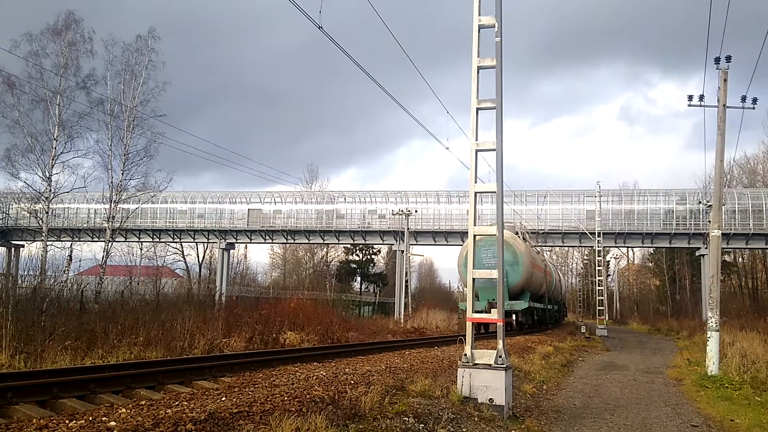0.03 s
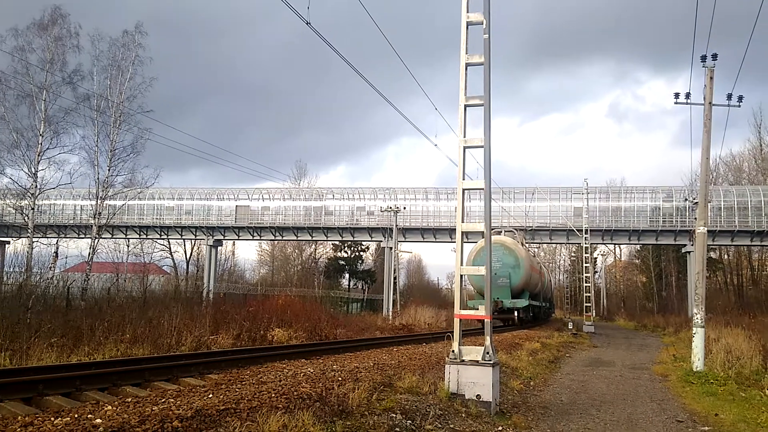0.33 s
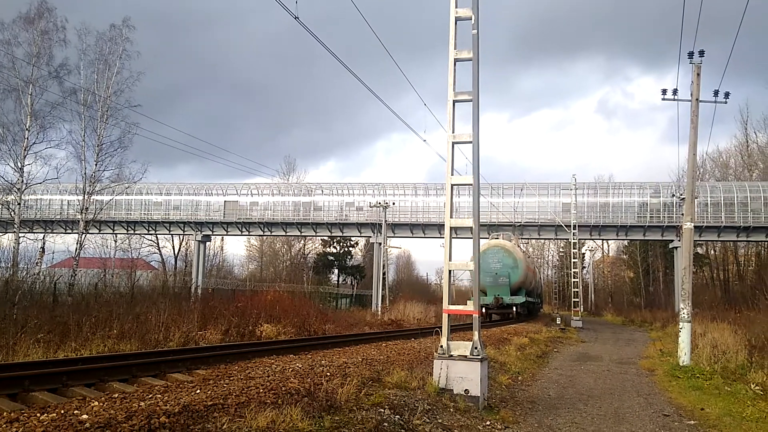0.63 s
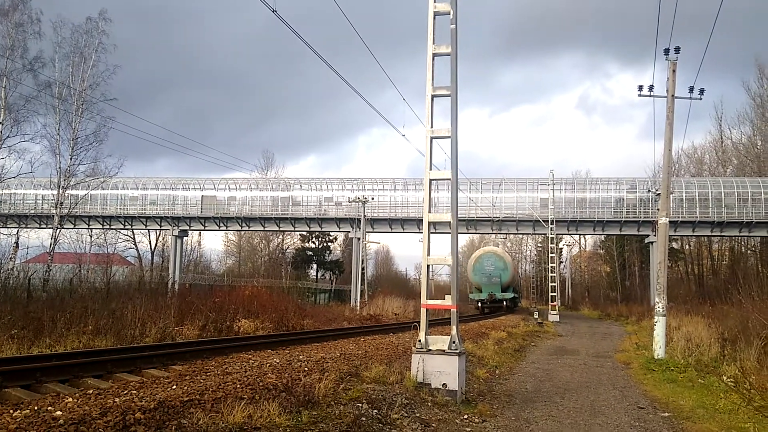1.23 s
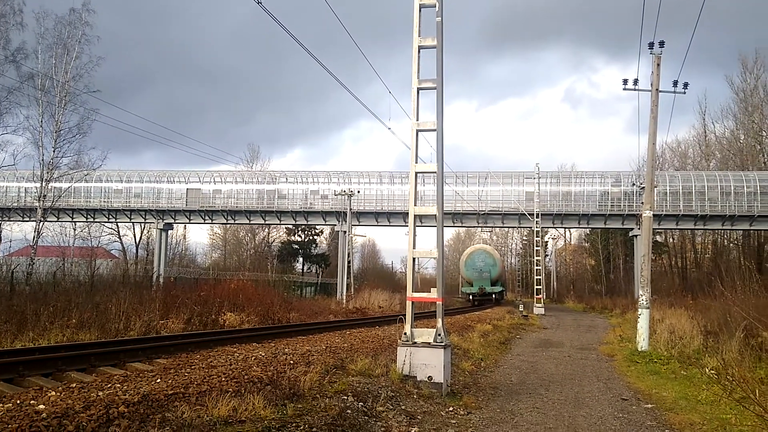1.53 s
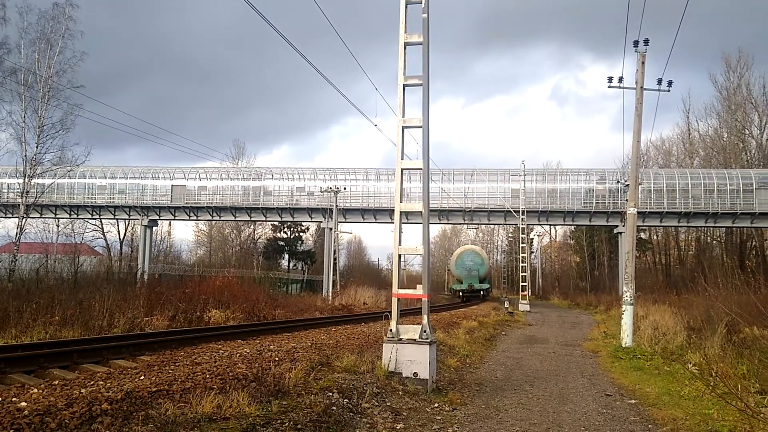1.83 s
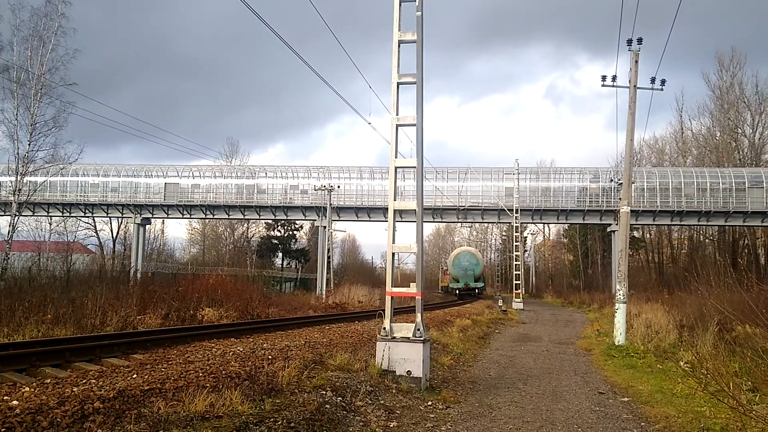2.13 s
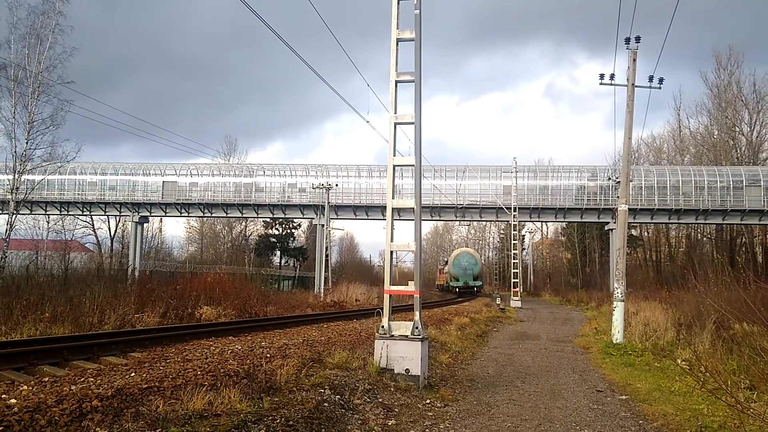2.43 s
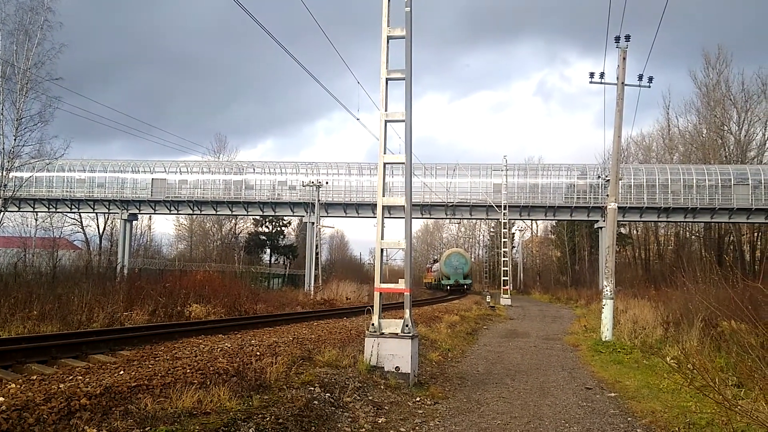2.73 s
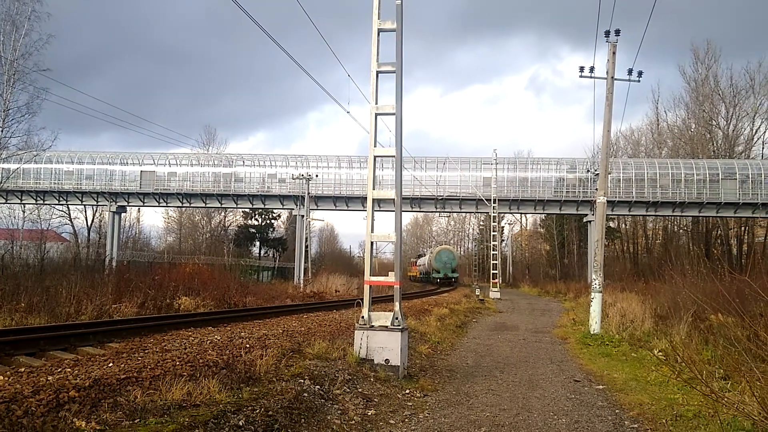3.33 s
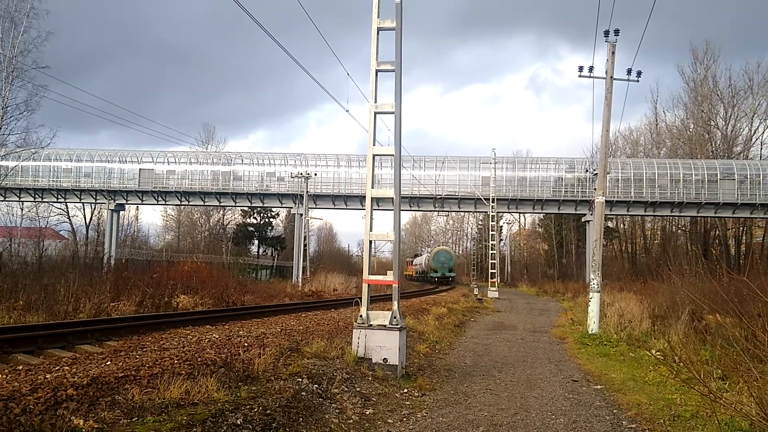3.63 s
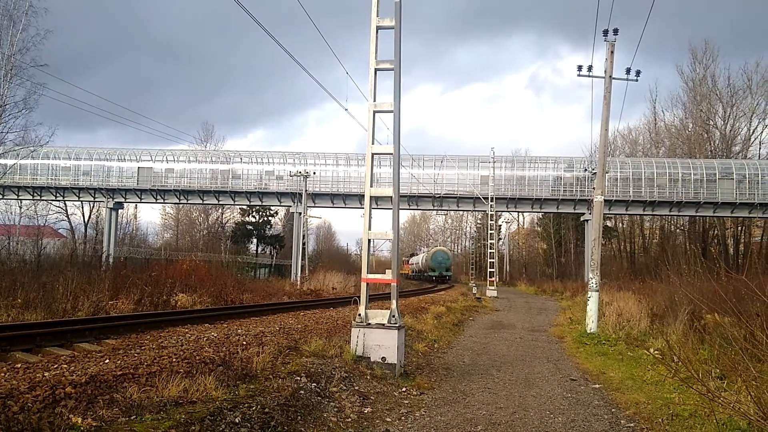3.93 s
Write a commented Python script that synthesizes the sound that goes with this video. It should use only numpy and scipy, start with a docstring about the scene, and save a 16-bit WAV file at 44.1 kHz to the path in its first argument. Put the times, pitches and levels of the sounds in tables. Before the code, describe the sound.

A freight train rolls away with a very high wheel squeal over fading rumble and thumps.

```python
"""A dull thump and a very high squeal, as a freight train's last tank wagons roll away round a curve.
Two wheels stick and slip at nearly the same pitch, so their tones beat against each other.
Their flanges (the rims that guide them) hiss on the rail. Underneath, the rolling roar fades and
dulls with distance over a rumble, with thumps from the running gear and knocks from the couplings."""
import sys
import numpy as np
from scipy import signal
from scipy.fft import rfft, irfft, next_fast_len
from scipy.io import wavfile
from scipy.ndimage import uniform_filter1d, map_coordinates

SR = 44100
rng = np.random.default_rng(int(sys.argv[2]) if len(sys.argv) > 2 else 0)


def to_wav(sig):
    """Store sig (one row per channel, or 1-D mono) as 16-bit WAV at the path in sys.argv[1].

    Samples outside -1..1 are clipped; the rate is SR.
    """
    pcm = np.clip(np.atleast_2d(sig), -1, 1) * 32767
    pcm = np.round(pcm).astype(np.int16)
    wavfile.write(sys.argv[1], SR, pcm.T)  # frames by channels


N = 176400
T = np.arange(N) / SR


def amp(db):
    """Turn decibels into a gain."""
    return 10 ** (np.asarray(db) / 20)


def unit(x):
    """Scale a signal to an average power of 1."""
    return x / np.sqrt(np.mean(x ** 2) + 1e-20)


def along(table, hz, column=1):
    """Read a table between its rows, on a log scale of frequency."""
    cols = np.transpose(table)
    return np.interp(np.log(hz + 1), np.log(cols[0] + 1), cols[column])


def curve(rows):
    """Join (seconds, value) rows with straight lines."""
    return np.interp(T, *np.transpose(rows))


def wobble(rate):
    """A smooth curve through `rate` random values a second."""
    return map_coordinates(rng.standard_normal(2000), [T * rate + 2], mode='wrap')


def pan(db):
    """Left and right gains, the left louder by `db`."""
    return unit(amp([[db / 2], [-db / 2]]))


def filtered(x, response):
    """Multiply each frequency in x by response(hz)."""
    size = next_fast_len(N + SR // 2)
    return irfft(rfft(x, size) * response(np.fft.rfftfreq(size, 1 / SR)), size)[..., :N]


def rush(colour, alike, patchy_db):
    """Patchy stereo noise: colour(hz) shapes it in dB, alike(hz) says how alike the two sides are."""
    spectrum = signal.stft(rng.standard_normal((2, N)), nperseg=512)[2]
    patches = uniform_filter1d(rng.standard_normal(spectrum.shape[1:]), size=6, axis=0)
    patches = uniform_filter1d(patches, size=12, axis=1)
    pair = signal.istft(spectrum * amp(patchy_db * unit(patches)), nperseg=512)[1][:, :N]
    turn = lambda hz: np.arccos(np.clip(alike(hz), -1, 1)) / 2
    mid, side = filtered(pair, lambda hz: np.array([np.cos(turn(hz)), np.sin(turn(hz))]))
    return unit(filtered(np.array([mid + side, mid - side]), lambda hz: amp(colour(hz))))


def stereo_colour(table):
    """A table's left and right colour, 40 dB lower beyond an octave past its ends."""
    outside = lambda hz: (hz < table[0][0] / 2) | (hz > table[-1][0] * 2)
    return lambda hz: np.array([along(table, hz, 1), along(table, hz, 2)]) - 40 * outside(hz)


# How alike left and right are in the rumble and roar. Each row: frequency in Hz, likeness (1 = same).
LIKENESS = [(60, .5), (120, .55), (200, .72), (350, .8), (600, .8), (1150, .42), (1500, .55), (2600, .45),
            (4400, .22), (7000, .05)]
# The rumble dying down. Each row: time in seconds, level in dB.
RUMBLE_LEVELS = [(0, -29.5), (.5, -31.5), (1.1, -34), (1.9, -33), (2.7, -33.5), (3.2, -36), (4, -39.5)]
# Its tone colour. Each row: frequency in Hz, relative level in dB.
RUMBLE_COLOUR = [(20, -36), (30, -52), (42, -7), (56, -6.5), (72, 0.5), (100, -7), (160, -6), (220, -11),
                 (290, -18.5), (500, -34)]

def rumble():
    """Wagon bodies and track bed shake under the load."""
    colour = lambda hz: along(RUMBLE_COLOUR, hz) - 12 * np.log2(1 + (hz / 900) ** 2)
    shaking = rush(colour, lambda hz: along(LIKENESS, hz), patchy_db=-0.5)
    return amp(curve(RUMBLE_LEVELS) + 0.58 * wobble(12)) * shaking


# Wheels rolling on the rail. Each row: time in seconds, relative level in dB.
ROAR_LEVELS = [(0.0, -37), (0.08, -38), (0.83, -39), (0.88, -38), (0.91, -41), (1.21, -39), (1.37, -41.5),
               (1.5, -38.5), (1.97, -41.5), (2.04, -39), (2.45, -41.5), (2.47, -40.5), (2.71, -42.5),
               (2.75, -40.5), (3.2, -41), (3.91, -43), (3.97, -40.5), (4.0, -44.5)]
# The roar's tone colour. Each row: frequency in Hz, left and right relative levels in dB.
ROAR_COLOUR = [(152, -17, -17), (292, -7, -11.5), (349, 4.5, 2.5), (402, -2, -3.5), (574, 1, 1),
               (970, -1.5, -5), (1177, -5, -6.5), (1554, -0.5, -3), (1800, -6.5, -8.5), (1995, -2.5, -3),
               (2820, -11, -5.5), (3460, -22, -9.5), (3550, -17, -12), (4170, -11, -9), (4420, -13.5, -15),
               (5200, -13, -25), (5680, -15.5, -24), (6600, -17.5, -35), (7360, -22.5, -23),
               (7150, -34.5, -24.5), (10200, -32, -33)]

def rolling_roar():
    """The roar of wheels on rail loses its treble as the train draws away."""
    left_lag_s, treble_hz, dulling_db_per_s, boost_db = 0.0001, 4300, 2, 2.5
    roar = rush(stereo_colour(ROAR_COLOUR), lambda hz: along(LIKENESS, hz), patchy_db=0.81)
    roar[0] = filtered(roar[0], lambda hz: np.exp(-2j * np.pi * hz * left_lag_s))
    treble = filtered(roar, lambda hz: 1 - 1 / (1 + (hz / treble_hz) ** 4))
    roar += treble * (amp(dulling_db_per_s * (1.5 - T)) - 1)
    return amp(curve(ROAR_LEVELS) + boost_db + 0.48 * wobble(23)) * roar


# Coupling knocks. Each row: start in seconds, level in dB, pitch in Hz, seconds to fade by 60 dB.
COUPLING_KNOCKS = [(.86, -39, 1500, .2), (2.03, -36, 1700, .35), (2.48, -38, 1100, .25),
                   (2.755, -36, 1600, .12), (3.305, -28, 400, .05), (3.635, -44, 2500, .2),
                   (3.955, -33, 560, .12)]

def knocks():
    """The couplings between wagons take up slack with short bursts of noise."""
    out = np.zeros((2, N))
    for start, db, pitch, fade_s in COUPLING_KNOCKS:
        age = np.maximum(T - start, 0)
        noise = rng.standard_normal(N) + 1.3 * rng.standard_normal((2, N))
        burst = unit(filtered(noise, lambda hz: (hz / pitch) ** 2 / (1 + (hz / pitch) ** 2.5) ** 2))
        out += amp(db - 60 * age / fade_s) * (1 - np.exp(-age / 0.0011)) * burst
    return out


# Thumps of the running gear. Each row: start in seconds, level in dB, pitch in Hz.
GEAR_THUMPS = [(.001, -14, 150), (.19, -24, 160), (.278, -16.5, 70), (.545, -18, 72), (.79, -17.5, 150),
               (1.86, -24, 72), (2.012, -18, 68), (2.28, -25, 100), (2.71, -24, 100), (2.906, -12, 72),
               (2.968, -18.5, 85), (3.335, -22, 62)]

def thumps():
    """Soft, heavy blows make a wagon ring briefly at a low pitch."""
    rise_s, fade_s, right_lead_radians = 0.008, 0.17, 0.7
    out = np.zeros((2, N))
    for start, db, hz in GEAR_THUMPS:
        age = np.maximum(T - start, 0)
        phase = 2 * np.pi * hz * age + np.array([[0], [right_lead_radians]])
        overtone = amp(-9) * np.sin(1.9 * phase + 2 * np.pi * rng.random())
        out += amp(db - 60 * age / fade_s) * (1 - np.exp(-age / rise_s)) * (np.sin(phase) + overtone)
    return out


# Flanges rubbing on the rail. Each row: time in seconds, relative level in dB.
RUB_LEVELS = [(0, -34), (.38, -35.5), (.66, -39.5), (1.1, -36), (1.2, -37), (1.32, -38), (1.48, -35.5),
              (1.85, -38), (2.3, -36.5), (2.72, -36), (2.82, -37), (2.9, -36), (3.07, -37.5), (3.26, -35),
              (3.55, -42.5), (3.8, -39.5), (4, -37.5)]
# Their hiss. Each row: frequency in Hz, relative level in dB.
HISS_COLOUR = [(12500, -30), (13500, -7), (14400, -9), (14900, -5), (15300, 0), (15720, 1), (15800, -8)]
# Their lower scrape. Each row: frequency in Hz, left and right relative levels in dB.
SCRAPE_COLOUR = [(6500, -47, -46), (8220, -25, -31.5), (8880, -17.5, -18), (10250, -21.5, -15),
                 (11100, -9.5, -19.5), (12330, 0.5, -3), (13100, -5, 2.5), (13940, -3.5, -1.5),
                 (15500, -11.5, -18.5)]

def flanges():
    """Steel rubs on steel: a high, surging hiss and a scrape that fades with distance."""
    hiss_boost_db, fade_db_per_s = 5, 4
    hiss_colour = lambda hz: along(HISS_COLOUR, hz) - 60 * (hz < HISS_COLOUR[0][0])
    hiss = rush(hiss_colour, lambda hz: np.full_like(hz, 0.32), patchy_db=1.2)
    scrape = rush(stereo_colour(SCRAPE_COLOUR), lambda hz: np.full_like(hz, 0.034), patchy_db=2.0)
    rub_db = curve(RUB_LEVELS)
    hiss_db = rub_db + hiss_boost_db + 0.8 * wobble(21.3)
    scrape_db = -34 - fade_db_per_s * T + 0.68 * (rub_db - rub_db.mean())
    return amp(hiss_db) * pan(db=7) * hiss + amp(scrape_db) * scrape


# Weaker wheel tones. Each row: pitch in Hz, width in Hz, time of the peak in seconds,
# rough half length in seconds, level in dB, left over right in dB.
WHEEL_RINGS = [(12835, 24, .35, .8, -42, 3), (12775, 40, 1.4, 1.0, -47, 3), (13278, 5, 1.85, .22, -28, 6),
               (15735, 24, .35, .6, -44, 2), (3952, 60, 1.0, 1.1, -58.5, -5),
               (3960, 140, 1.67, .04, -52, -5), (3965, 80, 2.59, .035, -56, -5),
               (5450, 250, .865, .02, -51, 5), (4911, 20, 1.5, 2, -75, 2), (6191, 16, 3.3, .8, -70, 4),
               (8979, 25, 1.0, 1.2, -74, 0), (11020, 20, 1, 1.2, -68, 2)]

def wheel_rings():
    """The wheels also ring at other natural pitches, in unsteady tones that swell and fade."""
    out = np.zeros((2, N))
    for hz, width_hz, peak_s, half_s, db, left_db in WHEEL_RINGS:
        drift = lambda: wobble(width_hz) + 1j * wobble(width_hz)  # random strength and phase
        stereo_drift = drift() + 0.63 * np.array([drift(), drift()])
        tone = np.real(stereo_drift * np.exp(2j * np.pi * hz * T))
        swell = np.exp(-((T - peak_s) / half_s) ** 2 / 2)
        out += amp(db) * pan(left_db) * unit(tone) * swell
    return out


# The lower and the higher squealing wheel. Each row: time in seconds, level in dB.
LOW_SQUEAL = [(0.0, -33), (0.64, -54), (0.78, -28), (1.5, -24), (1.66, -30.5), (2.02, -22.5), (2.28, -22),
              (2.52, -41), (2.64, -25.5), (3.46, -34.5), (3.64, -25.5), (3.99, -33)]
HIGH_SQUEAL = [(0.0, -31), (0.08, -35), (0.24, -29.5), (0.38, -27.5), (0.48, -34.5), (0.72, -39),
               (1.0, -20), (1.08, -31.5), (1.18, -20), (1.42, -28), (1.88, -25), (2.0, -28.5),
               (2.14, -24.5), (2.4, -29), (2.54, -20), (2.74, -18.5), (2.8, -28.5), (2.88, -21.5),
               (3.0, -24.5), (3.99, -22.5)]
# Rough noise of sticking and slipping. Each row: offset from the higher tone in Hz, relative level in dB.
SLIP_COLOUR = [(-700, -28), (-330, -16), (-160, -10), (-70, -1), (10, 0), (60, -3), (170, -4), (250, -13),
               (600, -18), (1000, -30)]

def squeal():
    """Two moving wheels stick and slip, each at its own pitch, echoing off trees and a footbridge."""
    low_hz, high_hz, waver_hz, flutter_db = 13265.5, 13329.0, 1.84, 1.14
    echo_db, echo_changes_per_s, left_lag_radians = -10, 26, 1.0
    drift = lambda: wobble(echo_changes_per_s) + 1j * wobble(echo_changes_per_s)
    tones, power = np.zeros((2, N)), np.zeros(N)
    for pitch, levels in ((low_hz, LOW_SQUEAL), (high_hz, HIGH_SQUEAL)):
        phase = 2 * np.pi * np.cumsum(pitch + waver_hz * wobble(14)) / SR
        gain = amp(curve(levels) + flutter_db * wobble(24.95))
        direct = np.exp(1j * np.array([phase - left_lag_radians, phase]))
        echoes = amp(echo_db) * np.array([drift(), drift()]) / np.sqrt(2)
        tones += gain * np.sqrt(2) * np.real(direct * (1 + echoes))
        power += gain ** 2
    colour = lambda hz: np.interp(hz - high_hz, *np.transpose(SLIP_COLOUR), left=-120, right=-120)
    slip = rush(colour, lambda hz: np.full_like(hz, 0.4), patchy_db=1)
    slip_gain = amp(-10) * np.sqrt((power + power.mean()) / 2)  # partly follows the tones
    return pan(db=6.5) * (tones + slip_gain * slip)


def scene():
    """The whole train rolling away, outdoors."""
    wheels = squeal() + wheel_rings() + flanges() + rolling_roar()
    return wheels + pan(db=-0.5) * (rumble() + thumps()) + knocks()


def record(dry):
    """Cut the deepest bass and the very highest treble."""
    low_cut_hz, top_hz = 26, 15800
    return filtered(dry, lambda hz: (hz < top_hz) * (1 - 1 / (1 + (hz / low_cut_hz) ** 4)))


dry = scene()
out = record(dry)
to_wav(out)
```